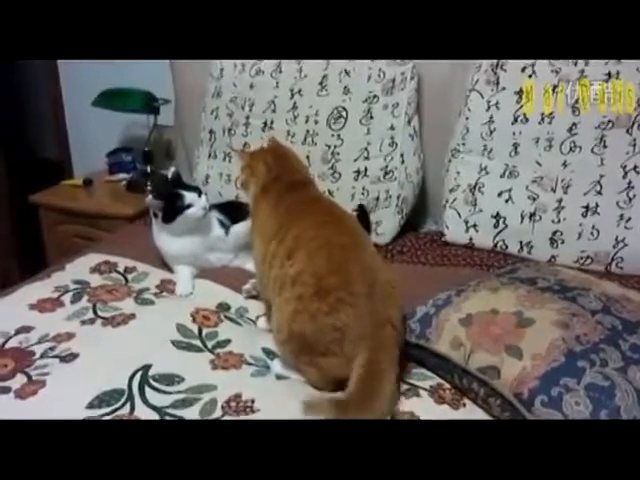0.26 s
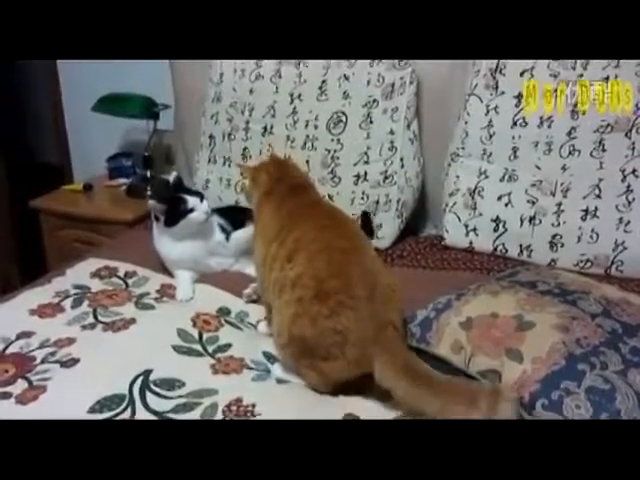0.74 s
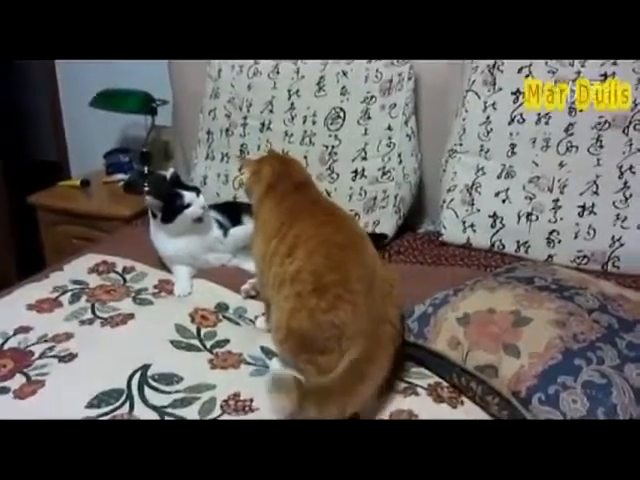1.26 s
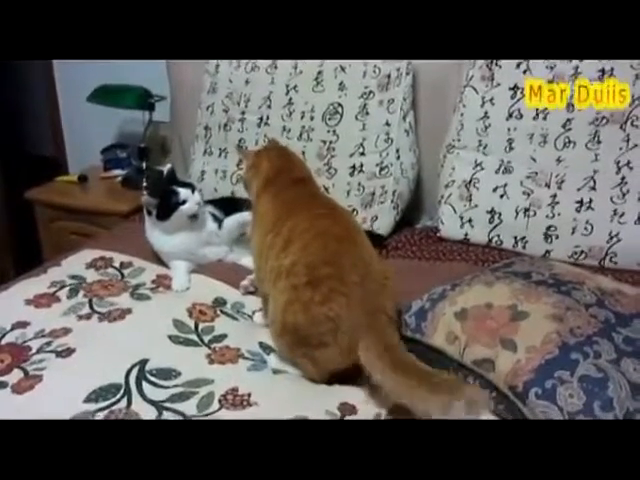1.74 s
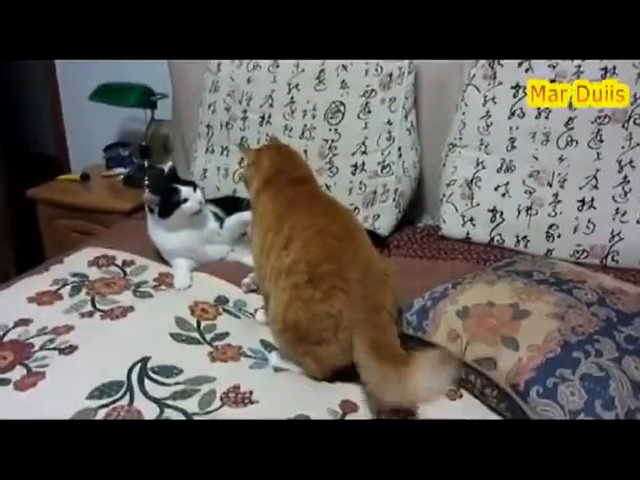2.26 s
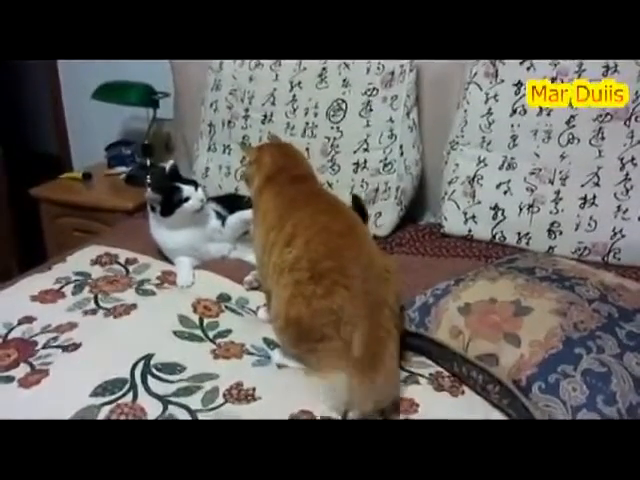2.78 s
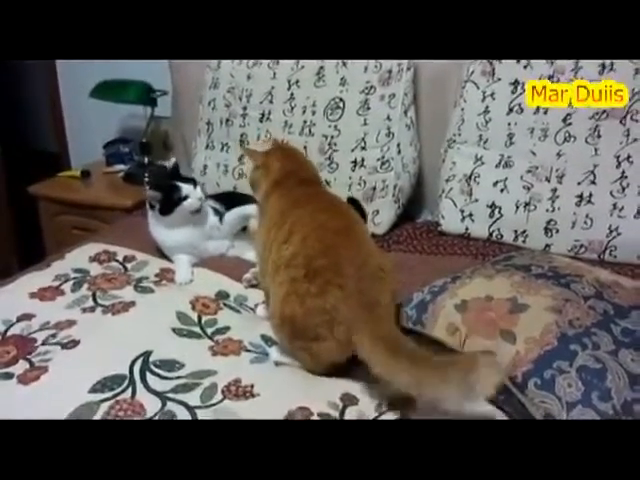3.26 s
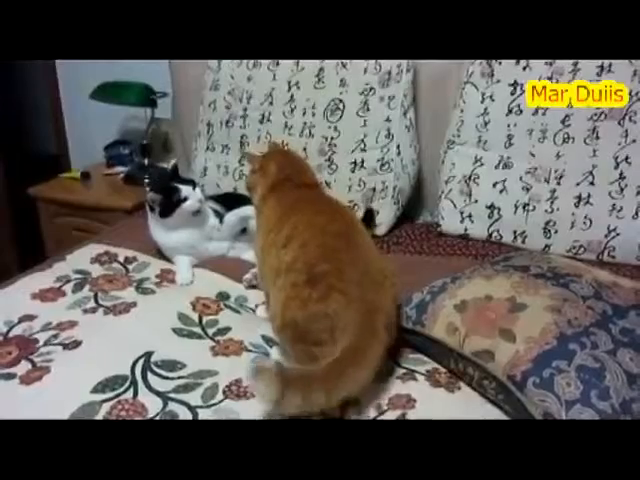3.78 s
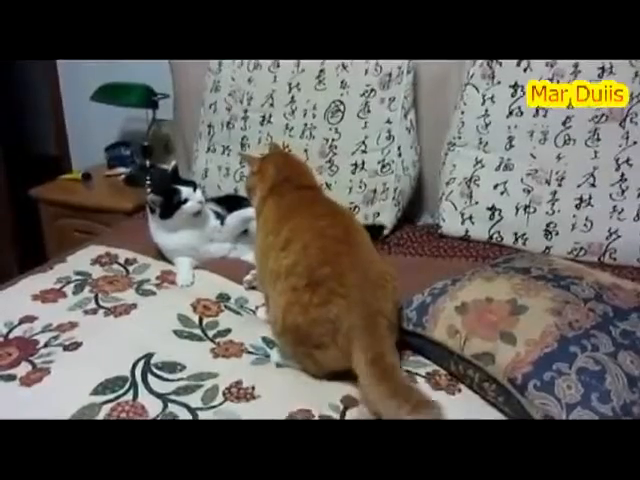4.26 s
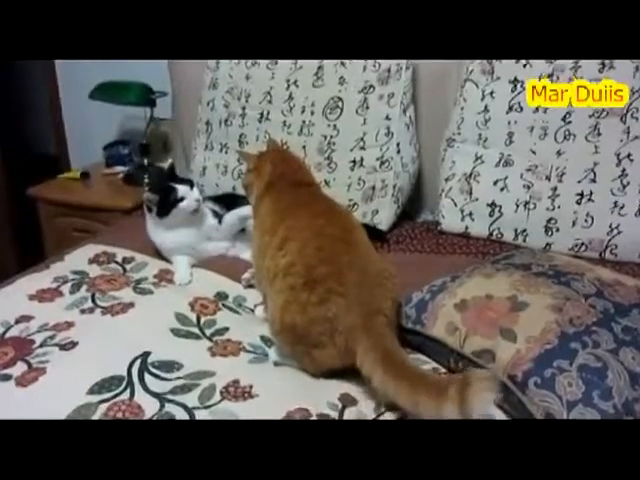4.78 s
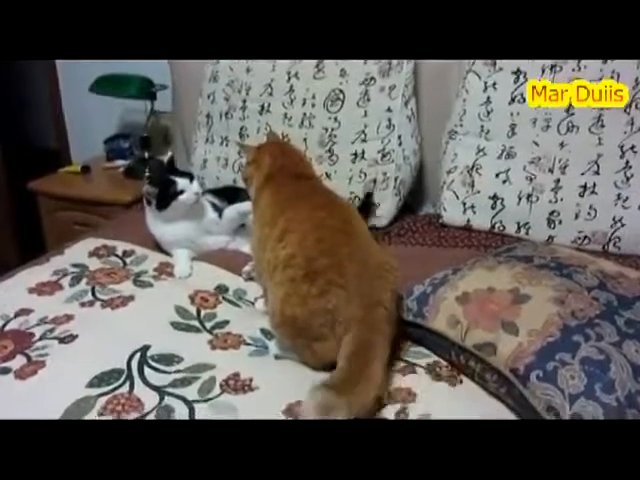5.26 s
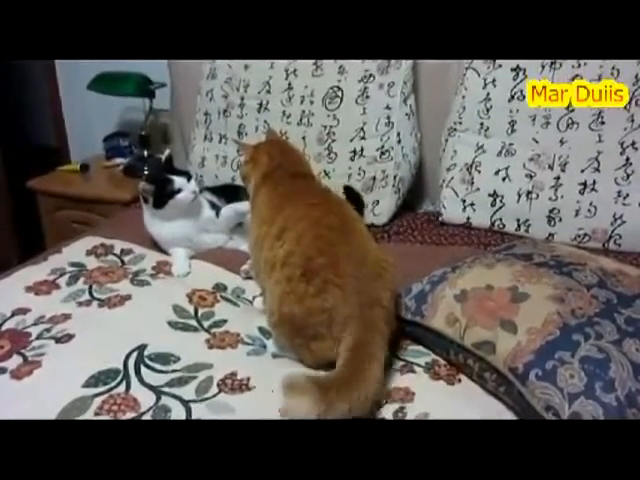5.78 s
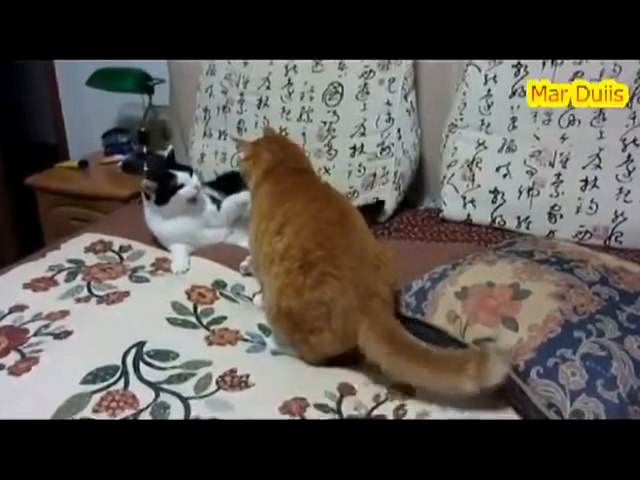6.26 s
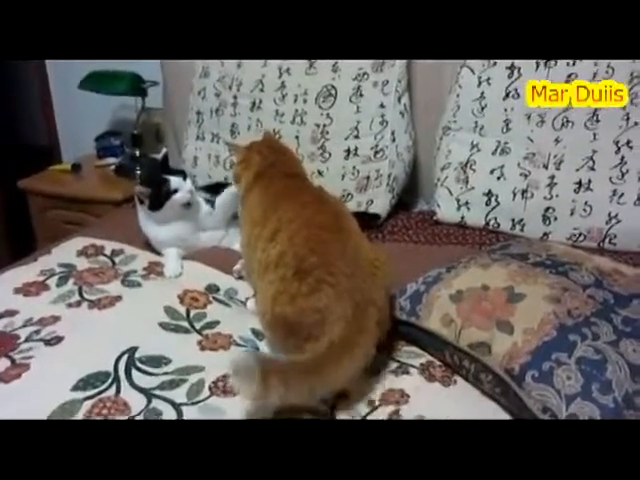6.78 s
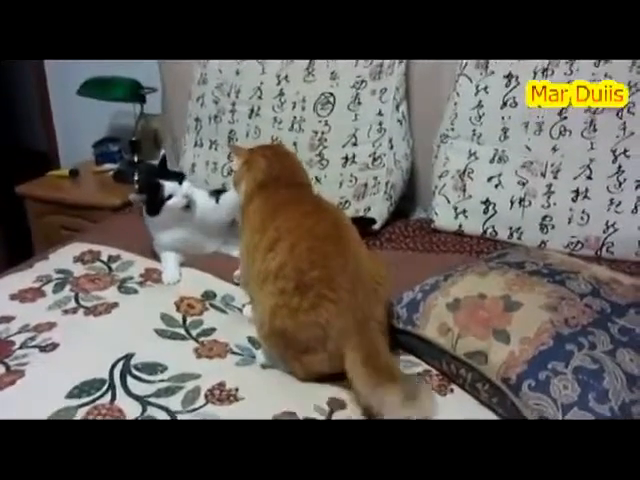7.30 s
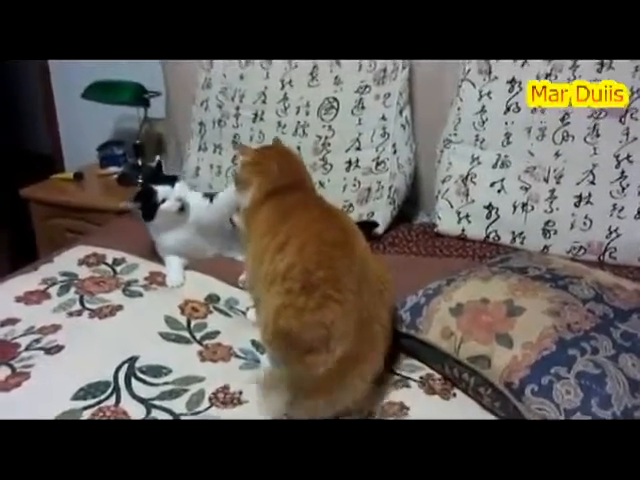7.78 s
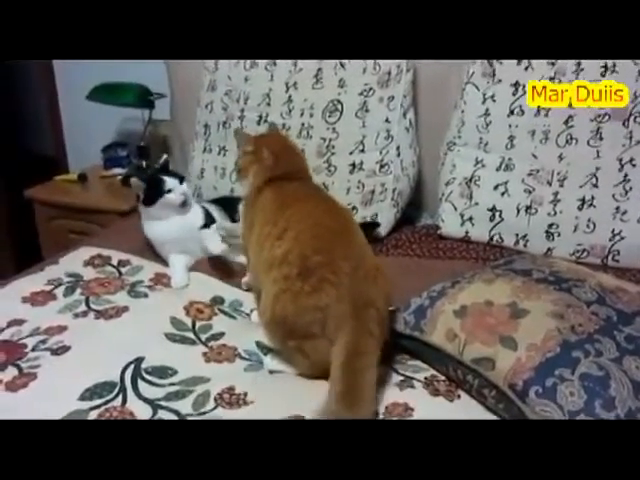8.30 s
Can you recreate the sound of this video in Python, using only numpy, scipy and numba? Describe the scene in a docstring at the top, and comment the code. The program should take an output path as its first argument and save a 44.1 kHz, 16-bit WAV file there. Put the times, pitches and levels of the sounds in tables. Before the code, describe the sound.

A cat gives a tiny chirp, three short raspy yowls and one long drawn-out yowl in a small bedroom over faint mains hum.

```python
"""Mains hum and soft room noise in a small bedroom come first, with a faint scuff once a second.
Two cats face off on the bed: one gives a tiny chirp, three short yowls and a long one, heard in stereo.
Pulses of the vocal folds ring through moving throat and mouth resonances; strain breaks them into a rasp.
Hum is a set of wavering sines; room noise, huffs and scuffs are coloured noise.
Short echoes, standing waves and a reverberant tail place the cat in the room."""
import sys
import numpy as np
from scipy import signal
from scipy.fft import rfft, irfft, next_fast_len
from scipy.io import wavfile
from scipy.ndimage import uniform_filter1d
from numba import njit

SR = 44100
rng = np.random.default_rng(int(sys.argv[2]) if len(sys.argv) > 2 else 0)


def generate_wav(signal):
    """Clip the signal to [-1, 1] and save it as 16-bit WAV at the path in sys.argv[1]."""
    frames = np.transpose(np.atleast_2d(signal))
    scaled = np.clip(frames, -1, 1) * 32767
    pcm = np.round(scaled).astype(np.int16)
    wavfile.write(sys.argv[1], SR, pcm)


N = 376557
TIME = np.arange(N) / SR

# Mains hum. Each row: frequency in Hz, peak level in dB before the background swell.
HUM = [(100, -46), (300, -62.5), (400, -66.5), (500, -56), (600, -61.5), (700, -63)]
# Colour of the room noise. Each row: frequency in Hz, relative level in dB.
ROOM_NOISE_COLOUR = [(15, -39.5), (25, -22), (66, -13), (100, -7.5), (135, -10), (400, -12.5), (640, -14.5),
                     (2400, -18.5), (5500, -29), (8750, -37.5), (11000, -52), (14000, -80)]
ROOM_NOISE_DB = -44.5   # before the background swell
# The background swells with the first yowl. Each row: time in seconds, gain in dB.
BACKGROUND_SWELL = [(0, -11.5), (1.08, -10), (1.2, -3.5), (2.1, -2), (3.3, -1), (8.5, -1)]
# Likeness of the noise in the two channels. Each row: frequency in Hz, likeness (held within 0-1 when used).
CHANNEL_LIKENESS = [(60, 1), (170, 0.39), (480, 0.53), (1370, 0.26), (3870, -1.3), (11000, 0.88)]

# Colour of huffs and scuffs. Each row: frequency in Hz, relative level in dB.
RUSTLE_COLOUR = [(300, -12.5), (700, 2.5), (950, 0.5), (1400, -0.5), (1900, 0.5), (2700, -5.5), (4300, -11),
                 (6000, -20), (9000, -28.5), (11000, -50)]
# The cat huffs. Each row: centre in seconds, bell spread in seconds, level in dB.
HUFFS = [(4.322, 0.05, -45), (8.283, 0.094, -43)]
# A soft scuff once a second, probably from a clock; its level is before the background swell.
SCUFF_FIRST_S, SCUFF_SPREAD_S, SCUFF_DB = 0.3, 0.042, -39.5

# Near surfaces around the bed. Each row: delay to the left channel in ms, to the right in ms, level in dB.
ECHOES = [(0.31, 0.28, -17), (0.97, 1.07, -29.5), (1.93, 1.956, -16.5), (5.35, 4.9, -19), (6.1, 6.07, -14),
          (11.71, 11, -10.5)]
# Standing waves make each harmonic swell and sink as it glides through them.
# Each row: frequency in Hz, nominal width in Hz, left gain in dB, right gain in dB.
STANDING_WAVES = [(437.2, 7.1, -14.5, -8.5), (457.8, 14, 5.5, -2), (475.3, 11.5, -9, -11.5),
                  (878, 7.9, -2, -10.5), (954, 35, 1, 1.5), (1405, 10, -3, -7.5), (1580, 130, -9, -9.5),
                  (2060, 77, -1, -2), (2520, 19, -4.5, -3.5), (2624, 260, -4, 2.5), (2877, 41, 3.5, 10),
                  (3337, 31, 8, 1)]

# The calls, a chirp first. Each row: start in seconds, end in seconds, attack in seconds, release in
# seconds, fundamental in dB, dark throat tone in dB, throat resonance in Hz, roughness at the start 0-1.
CALLS = [(0.851, 0.915, 0.014, 0.038, -57.5, -52, 893.6, 0),
         (1.105, 2.013, 0.031, 0.043, -44.5, -38, 980, 0.77),
         (3.266, 4.07, 0.022, 0.088, -44, -37.3, 986, .7), (4.079, 4.726, 0.065, 0.049, -47, -37, 820, 0),
         (6.209, 8.287, 0.011, 0.2, -43.5, -37.5, 1072, 0.73)]
CHIRP_HZ, CHIRP_DB = 616.4, -48.5
# Pitch of the three short yowls, one list each, then of the long one. Each row: time in seconds, pitch in Hz.
SHORT_PITCH = [
    [(1.115, 466), (1.15, 412), (1.21, 419.4), (1.23, 441.3), (1.288, 440.3), (1.314, 430.2), (1.378, 431),
     (1.424, 453), (1.494, 445.5), (1.58, 472.2), (1.642, 471.7), (1.68, 483), (1.72, 474.8), (1.82, 475.1),
     (1.89, 466.8), (1.96, 476.7), (1.99, 493)],
    [(3.28, 488.5), (3.3, 457.3), (3.384, 444.3), (3.41, 466.3), (3.484, 468.7), (3.612, 443.7),
     (3.744, 452.4), (3.796, 467.2), (3.95, 429), (4.0, 452.6)],
    [(4.09, 521.7), (4.14, 463.6), (4.19, 445.8), (4.27, 466.7), (4.34, 446), (4.38, 454), (4.52, 432),
     (4.664, 425), (4.68, 421.2)],
]
LONG_PITCH = [(6.232, 433), (6.301, 436.6), (6.32, 463.4), (6.376, 484.9), (6.519, 471.1), (6.88, 439.9),
              (6.954, 450.5), (7.071, 452.6), (7.141, 468.7), (7.181, 454.4), (7.213, 479.4),
              (7.269, 451.6), (7.321, 467.7), (7.499, 433.9), (7.598, 457), (7.699, 433.1), (7.85, 456),
              (7.89, 453.3), (8.015, 467.3), (8.091, 462.6), (8.15, 416), (8.261, 406)]
# Their effort, as the level of the bright mouth tone. Each row: time in seconds, level in dB.
SHORT_EFFORT = [
    [(1.13, -29.5), (1.19, -36), (1.202, -28), (1.31, -25.5), (1.342, -30), (1.37, -24.5), (1.688, -25.5),
     (1.748, -29.5), (1.82, -25), (1.936, -26), (1.96, -33)],
    [(3.29, -26), (3.378, -24.5), (3.426, -31), (3.618, -28.5), (3.682, -33.5), (3.824, -23.5),
     (3.934, -31), (3.98, -41.5)],
    [(4.13, -41), (4.214, -37.5), (4.25, -56), (4.346, -52), (4.358, -32.5), (4.438, -24.5), (4.476, -30),
     (4.68, -27)],
]
LONG_EFFORT = [(6.23, -26.5), (6.63, -24.5), (6.69, -26.5), (6.72, -28), (6.81, -29), (6.888, -27),
               (6.948, -28), (7.112, -26.5), (7.3, -28), (7.55, -31.5), (7.8, -27.5), (8.01, -26.5),
               (8.07, -34), (8.13, -37), (8.22, -30)]

# The jaw opens wide. Each row: widest at in seconds, opening spread and closing spread in seconds, width 0-1.
GAPES = [(1.16, 0.021, 0.03, 0.85), (1.53, 0.15, 0.13, 0.89), (3.296, 0.024, 0.049, 0.81),
         (6.269, 0.13, 0.17, 0.94)]
# The lips narrow through the end of the long yowl. Each row: time in seconds, narrowing 0-1.
LIP_NARROWING = [(6.55, 0.01), (7.2, 0.33), (7.55, 0.55), (8.0, 0.48), (8.25, 0.6)]
# The second resonance follows the mouth shape and sinks as the long yowl closes.
# Each row: time in seconds, resonance in Hz.
MOUTH_RESONANCE = [(1.11, 2030), (1.2, 2230), (1.58, 2185), (1.8, 2300), (1.95, 2276), (3.27, 1968),
                   (3.32, 2310), (3.68, 2010), (3.82, 2249), (3.98, 2026), (4.2, 2184), (4.43, 2450),
                   (4.68, 2263), (6.21, 2086), (6.35, 2335), (6.68, 2312), (6.8, 2030), (6.89, 2382),
                   (7.0, 2360), (7.15, 2560), (7.22, 2000), (7.43, 2270), (7.6, 1748), (7.93, 1923),
                   (8.03, 1680), (8.12, 1412), (8.22, 2100)]
# Upper resonances of the mouth, a thin sheen on the voice. Each row: centre in Hz, width in Hz,
# level in dB against the tone, dB added by a full gape, dB added by fully narrowed lips.
SHEEN_BANDS = [(4537, 1050, -31, 15.5, -2), (7230, 800, -46.5, 21, 25), (8550, 720, -43, 18.5, 17.5)]
# The sheen swells and sinks. Each row: centre in seconds, bell spread in seconds, change in dB.
SHEEN_SWELLS = [(1.288, 0.036, -9), (4.55, 0.061, 0), (6.769, 0.071, -6), (7.017, 0.1, 5.5),
                (7.36, .06, -20), (7.72, .11, 5.5)]

# The strained voice breaks into a rasp. Each row: centre in seconds, bell spread in seconds, added roughness.
RASPS = [(1.257, 0.055, 0.25), (1.387, 0.018, 0.67), (1.446, 0.042, 0.44), (1.681, 0.0203, 0.61),
         (1.679, 0.1, 0.07), (4.301, 0.035, 1.04), (4.506, 0.025, 0.2), (6.291, 0.024, 0.31),
         (7.144, 0.028, 0.21), (7.228, 0.035, .9), (7.362, 0.05, 0.32), (7.517, 0.054, 0.3),
         (7.86, 0.12, 0.14), (8.042, 0.042, 0.59), (8.2, .06, 0.77)]
# The folds slip into alternate strong and weak cycles.
# Each row: centre in seconds, length (twice the bell spread) in seconds, depth 0-1.
CYCLE_DOUBLING = [(1.44, 0.054, 0.14), (1.684, 0.034, 0.83), (1.75, 0.076, .11), (7.245, 0.026, 0.28),
                  (8.033, 0.058, 0.15)]

# Roughness 0-1: the folds catch as each call starts and falter as it stops.
CALM_ROUGH, START_ROUGH_S, STOP_ROUGH, STOP_ROUGH_S = 0.013, 0.06, 0.827, 0.0277
# At full roughness the pulses vary in size, from cycle to cycle and in a slower rattle.
SHIMMER, GROWL = 0.4, 0.36
BREAK_DB = -5   # the low tones weaken when the voice breaks fully

# Resonance widths at rest; a wide jaw sharpens the second, narrow lips and strain damp the third.
THROAT_WIDTH_HZ, SECOND_WIDTH_HZ, THIRD_WIDTH_HZ = 440, 570, 325
GAPE_SHARPENS, LIPS_DAMP, STRAIN_DAMPS = 1, 0.43, 1.1
THIRD_HZ, THIRD_GAPE_HZ = 2727, 1100
# The larynx lifts with the pitch and takes the third resonance along, as far as it can reach (Hz of pitch).
USUAL_PITCH_HZ, THIRD_FOLLOWS_PITCH, THIRD_REACH_HZ = 446, 2.4, 25
# A wide jaw hollows the band below the second resonance and radiates more treble.
GAPE_HOLLOW_HZ, GAPE_HOLLOW_DB = (1566, 1880), -19
GAPE_TREBLE_HZ, GAPE_TREBLE_DB = 3350, 13.5
# The throat tone gives way as the jaw opens, gains behind narrow lips and follows a share of the effort,
# but only down to SLACK_DB below the usual effort.
THROAT_GAPE_DB, THROAT_NARROWING_DB, THROAT_FOLLOWS = -2.5, 13.5, 0.22
USUAL_EFFORT_DB, SLACK_DB = -31.5, -17
# The fundamental gains behind narrow lips and stops only with the call's very end.
FUNDAMENTAL_NARROWING_DB, FUNDAMENTAL_RELEASE_S = 3.5, 0.019


def from_db(db):
    """Decibels to gain."""
    return 10 ** (np.asarray(db) / 20)


def rms_one(x):
    """Scale to unit power."""
    return x / np.sqrt(np.mean(x ** 2) + 1e-20)


def in_time(rows):
    """Each column of a curve at every sample."""
    s, *columns = np.transpose(rows)
    return [np.interp(TIME, s, column) for column in columns]


def at_hz(points, hz):
    """Read a spectrum on a log-frequency axis."""
    points = np.array(points)
    return np.interp(np.log(hz + 1), np.log(points[:, 0]), points[:, 1])


def swell(s, spread):
    """A bell-shaped rise and fall; the spread is its standard deviation in seconds."""
    return np.exp(-0.5 * ((TIME - s) / spread) ** 2)


def cut(x, hz, kind, order=2):
    """Butterworth filter."""
    return signal.sosfilt(signal.butter(order, hz, kind, fs=SR, output="sos"), x)


def lows(x, hz, order):
    """The part below a frequency, filtered forth and back so that it stays in phase with the rest."""
    forth = cut(x, hz, "low", order=order)
    return cut(forth[::-1], hz, "low", order=order)[::-1]


def bell(x, hz, width, db):
    """Lift or sink a narrow band."""
    band = signal.lfilter(*signal.iirpeak(hz, hz / width * from_db(db / 2), fs=SR), x)
    return x + (from_db(db) - 1) * band


def wander(hz):
    """Random motion up to about the given rate; spread 1."""
    return rms_one(cut(rng.standard_normal(N + SR), hz, "low")[SR:])


def even(x):
    """Hold the short-term power near 1."""
    power = uniform_filter1d(uniform_filter1d(x * x, size=500), size=500)
    return x / np.sqrt(np.abs(power) + 1e-14)


def stereo_noise(spectrum):
    """Coloured noise whose likeness between left and right depends on frequency."""
    size = next_fast_len(N, True)
    hz = np.fft.rfftfreq(size, 1 / SR)
    mid, side = rfft(rng.standard_normal((2, size)))
    alike = np.clip(at_hz(CHANNEL_LIKENESS, hz), 0, 1)
    both = np.sqrt(1 + alike) * mid + np.sqrt(1 - alike) * side * [[1], [-1]]
    return rms_one(irfft(both * from_db(at_hz(spectrum, hz)), size)[:, :N])


def background(hum_waver_db=2.5, rumble_db=-44, rumble_noise=0.72):
    """Wavering mains hum, room noise, and one passing low rumble."""
    hum = 0
    for hz, db in HUM:
        level = from_db(db + hum_waver_db * wander(hz=8.7))
        hum = hum + level * np.sin(2 * np.pi * (hz * TIME + rng.random()))
    room_noise = from_db(ROOM_NOISE_DB) * stereo_noise(ROOM_NOISE_COLOUR)
    drone = np.sin(2 * np.pi * np.cumsum(73 + 3 * wander(hz=11)) / SR)
    rumble = from_db(rumble_db) * swell(7.5, 0.18) * (drone + rumble_noise * wander(hz=132))
    level_db, = in_time(BACKGROUND_SWELL)
    return from_db(level_db) * (hum + room_noise) + rumble


def rustles():
    """Noise bursts: the cat's huffs, and the scuff that recurs every second in the background."""
    level_db, = in_time(BACKGROUND_SWELL)
    scuff_times = np.arange(SCUFF_FIRST_S, N / SR)   # one second apart
    scuffs = from_db(SCUFF_DB + level_db) * sum(swell(s, SCUFF_SPREAD_S) for s in scuff_times)
    huffs = sum(from_db(db) * swell(s, spread) for s, spread, db in HUFFS)
    return stereo_noise(RUSTLE_COLOUR) * (scuffs + huffs)


def bedroom(x, t60=0.6, tail_db=-6.5, dull_hz=4500, alike_hz=1300, right_lag_ms=0.022):
    """Echoes off the near furniture, standing waves, and a short tail soaked up by the bedding."""
    x = np.array([x[0], np.interp(TIME - right_lag_ms / 1000, TIME, x[1])])
    out = x.copy()
    for left_ms, right_ms, db in ECHOES:
        for side, ms in enumerate((left_ms, right_ms)):
            out[side] += from_db(db) * np.interp(TIME - ms / 1000, TIME, x[side], left=0)
    t = TIME[:SR // 2]
    tail = cut(rng.standard_normal((2, len(t))), dull_hz, "low", order=1)
    tail = cut(tail, alike_hz, "high", order=1)
    tail += cut(rng.standard_normal(len(t)), alike_hz, "low")   # long waves reach both channels alike
    tail = tail * from_db(-60 * t / t60) * (t > 0.006)
    tail = tail / np.sqrt(np.sum(tail ** 2, axis=1, keepdims=True) * SR / (2 * dull_hz))
    out += from_db(tail_db) * signal.fftconvolve(x, tail, axes=1)[:, :N]
    for hz, width, *channels_db in STANDING_WAVES:
        out = np.array([bell(channel, hz, width, db) for channel, db in zip(out, channels_db)])
    return out


def through_calls(chirp_value, short_curves, long_curve):
    """One control through the chirp and all the yowls."""
    chirp = [(s, chirp_value) for s in CALLS[0][:2]]
    shorts = [row for curve in short_curves for row in curve]
    return in_time(chirp + shorts + list(long_curve))[0]


def phrasing():
    """Each call rises, holds and fades, with its own levels, throat resonance and roughness at the ends."""
    rise, fade, linger, rough = np.zeros((4, N))
    held = []
    for start, end, attack, release, low_db, dark_db, throat_hz, catch in CALLS:
        on = (TIME > start) & (TIME < end)
        since, left = TIME[on] - start, end - TIME[on]
        rise[on] = np.minimum(since / attack, 1)
        fade[on] = np.minimum(left / release, 1)
        linger[on] = np.minimum(left / FUNDAMENTAL_RELEASE_S, 1)
        falter = STOP_ROUGH * min(end - start, 1)   # a brief chirp stays clear
        rough[on] = catch * np.exp(-since / START_ROUGH_S) + falter * np.exp(-left / STOP_ROUGH_S)
        held += [(s, low_db, dark_db, throat_hz) for s in (start, end)]
    rough += CALM_ROUGH + sum(depth * swell(s, spread) for s, spread, depth in RASPS)
    fundamental_db, throat_db, throat = in_time(held)
    return rise, fade, linger, fundamental_db, throat_db, throat, np.clip(rough, 0, 1)


def jaw():
    """How wide the mouth stands: each gape opens and closes at its own pace."""
    return sum(width * swell(s, np.where(TIME < s, opening, closing))
               for s, opening, closing, width in GAPES)


@njit
def resonate(x, hz, width):
    """A moving resonance that passes the bass and falls away above its peak."""
    y = np.zeros(len(x))
    for i in range(2, len(x)):
        r = np.exp(-np.pi * width[i] / SR)
        a = 2 * r * np.cos(2 * np.pi * hz[i] / SR)
        y[i] = (1 - a + r * r) * x[i] + a * y[i - 1] - r * r * y[i - 2]
    return y


def folds(pitch, rough, tremor=0.00326, quaver=0.0189, jitter=0.02431, growl_hz=(110, 170), flutter_db=4.5,
          rasp=0.89, hiss=0.47, strain_hiss=1.8, rasp_hz=(1650, 4400), hiss_hz=6500, smear=0.15):
    """Vocal folds: overtone pulses and fundamental; strain unsettles timing and size and lets air through."""
    unsteady = rough * (quaver * wander(hz=53.8) + jitter * wander(hz=182.0))
    pitch = pitch * (1 + tremor * wander(hz=34.0) + unsteady)
    phase = 2 * np.pi * np.cumsum(pitch) / SR
    pulses = 0
    for k in range(2, 23):
        partial = np.cos(k * phase - smear * k * k)   # each pulse spreads over part of its cycle
        if k < 9:   # each strong partial wavers on its own
            partial = partial * from_db(flutter_db * np.sqrt(rough) * wander(hz=31.5))
        pulses = pulses + partial
    pulses = rms_one(pulses)
    doubling = sum(depth * swell(s, length / 2) for s, length, depth in CYCLE_DOUBLING)
    rattle = rms_one(cut(rng.standard_normal(N), growl_hz, "band"))   # a slower, uneven vibration
    size = 1 + doubling * np.cos(phase / 2) + rough * (SHIMMER * wander(hz=220) + GROWL * rattle)
    air = rng.standard_normal(N) * (1 + np.cos(phase))   # one puff per opening
    # turbulence roughens the upper partials and leaves the low ones clear
    rasping = rasp * rough * cut(air, rasp_hz, "band", order=2)
    hissing = (hiss + strain_hiss * rough) * cut(air, hiss_hz, "high", order=4)
    return size * (pulses + rasping + hissing), rms_one(np.cos(phase))


def sheen_on_top(source, tone_db, gape, narrowing):
    """Thin upper mouth resonances, lifted or lowered by jaw and lips."""
    sheen = 0
    for hz, width, db, gape_db, lips_db in SHEEN_BANDS:
        band = even(cut(source, [hz - width / 2, hz + width / 2], "band"))
        sheen = sheen + from_db(db + gape_db * gape + lips_db * narrowing) * band
    swells_db = sum(db * swell(s, spread) for s, spread, db in SHEEN_SWELLS)
    return from_db(tone_db + swells_db) * sheen


def yowl(bass_cut_hz=600, split_hz=1600, flutter_db=0.7, throat_waver_db=1.7):
    """The pulses ring in throat and mouth over a plain fundamental, with a thin sheen on top."""
    pitch = through_calls(CHIRP_HZ, SHORT_PITCH, LONG_PITCH)
    effort_db = through_calls(CHIRP_DB, SHORT_EFFORT, LONG_EFFORT)
    rise, fade, linger, fundamental_db, throat_db, throat, rough = phrasing()
    gape = jaw()
    narrowing, = in_time(LIP_NARROWING)
    second, = in_time(MOUTH_RESONANCE)
    larynx_lift = np.minimum(pitch - USUAL_PITCH_HZ, THIRD_REACH_HZ)
    third = THIRD_HZ + THIRD_GAPE_HZ * gape + THIRD_FOLLOWS_PITCH * larynx_lift
    throat_width = np.full(N, float(THROAT_WIDTH_HZ))
    second_width = SECOND_WIDTH_HZ / (1 + GAPE_SHARPENS * gape)
    third_width = THIRD_WIDTH_HZ * (1 + LIPS_DAMP * narrowing + STRAIN_DAMPS * rough)

    source, fundamental = folds(pitch, rough)
    voice = cut(source, bass_cut_hz, "high", order=2)
    for hz, width in ((throat, throat_width), (second, second_width), (third, third_width)):
        voice = resonate(voice, hz, width)
    hollow = cut(voice, GAPE_HOLLOW_HZ, "band", order=1)
    voice = voice + (from_db(GAPE_HOLLOW_DB * np.sqrt(gape)) - 1) * hollow
    treble = voice - lows(voice, GAPE_TREBLE_HZ, order=4)
    voice = voice + (from_db(GAPE_TREBLE_DB * gape) - 1) * treble
    low = lows(voice, split_hz, order=10)

    push_db = np.maximum(effort_db - USUAL_EFFORT_DB, SLACK_DB)
    break_db = BREAK_DB * rough ** 2
    dark_db = throat_db + THROAT_GAPE_DB * gape + THROAT_NARROWING_DB * narrowing + THROAT_FOLLOWS * push_db
    moan_db = fundamental_db + FUNDAMENTAL_NARROWING_DB * narrowing + break_db * fade
    moan = linger * from_db(moan_db) * fundamental   # dies last
    dark = from_db(dark_db + break_db + throat_waver_db * wander(hz=11)) * even(low)
    bright = from_db(effort_db + flutter_db * wander(hz=30.5)) * even(voice - low)
    bright = np.sqrt(fade) * bright   # dies first
    sheen = sheen_on_top(source, np.maximum(effort_db, dark_db), gape, narrowing)
    # left and right gains in dB
    overtones = dark * from_db([[-0.5], [-0.3]]) + bright * from_db([[-1.3], [0.5]]) + sheen
    return rise * (moan + fade * overtones)


def scene():
    """The cat in its room, over the background."""
    return background() + rustles() + bedroom(yowl())


def record(dry, cutoff_hz=11200):
    """The top is cut steeply."""
    return signal.sosfilt(signal.ellip(10, 0.2, 80, cutoff_hz, fs=SR, output="sos"), dry)


dry = scene()
out = record(dry)
generate_wav(out)
```